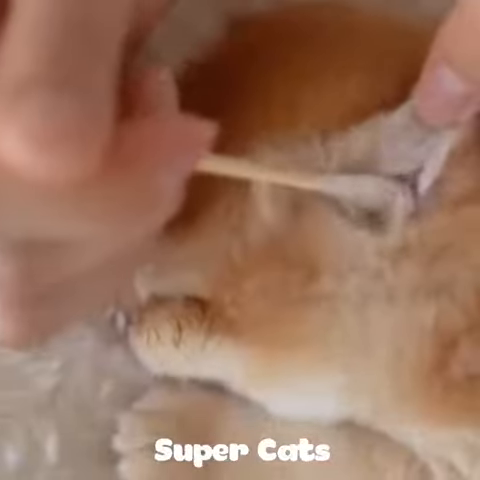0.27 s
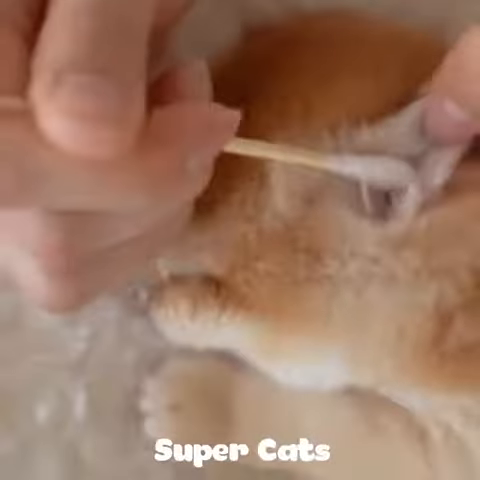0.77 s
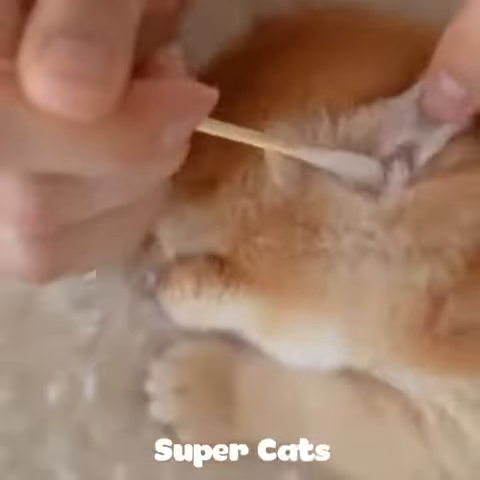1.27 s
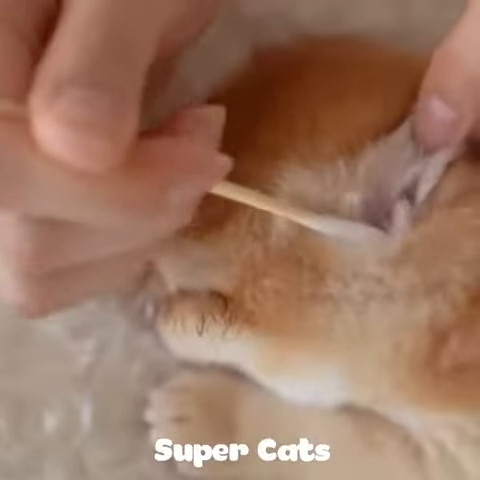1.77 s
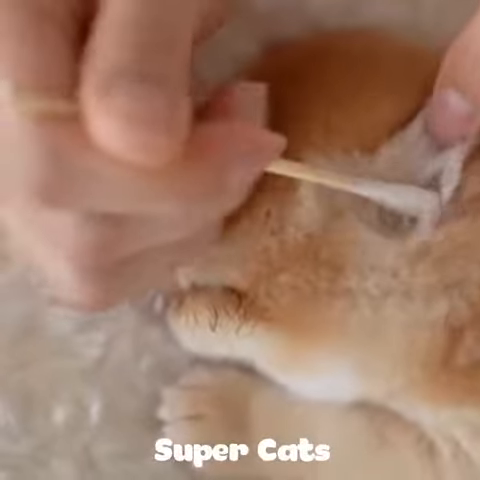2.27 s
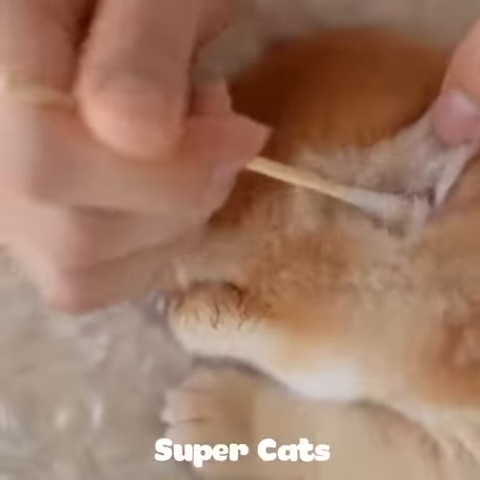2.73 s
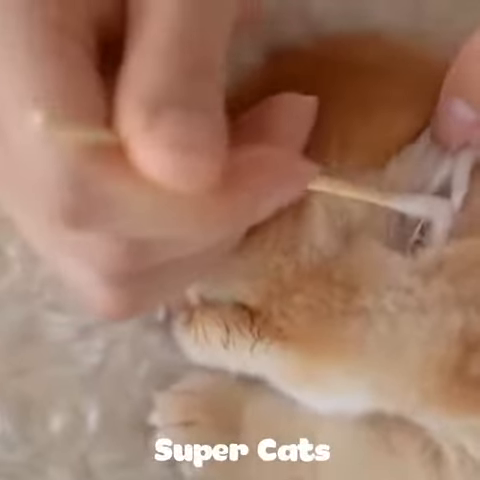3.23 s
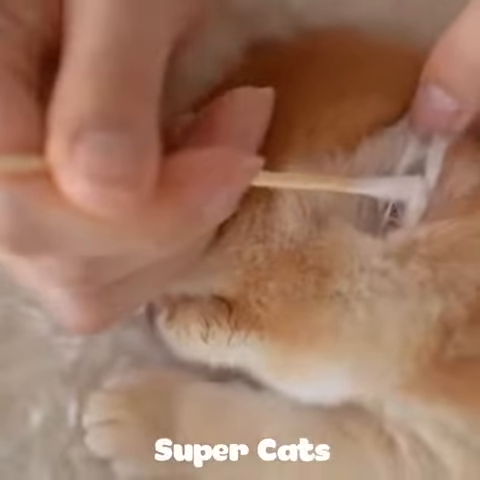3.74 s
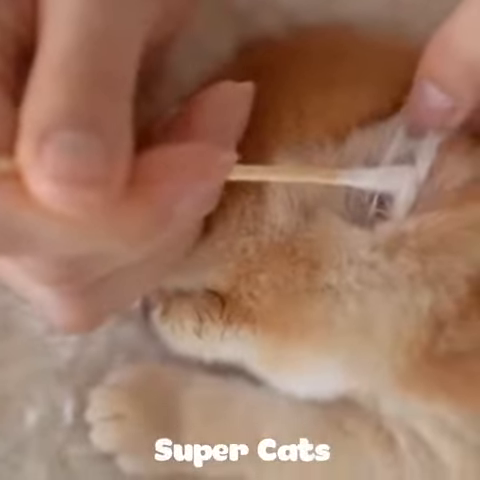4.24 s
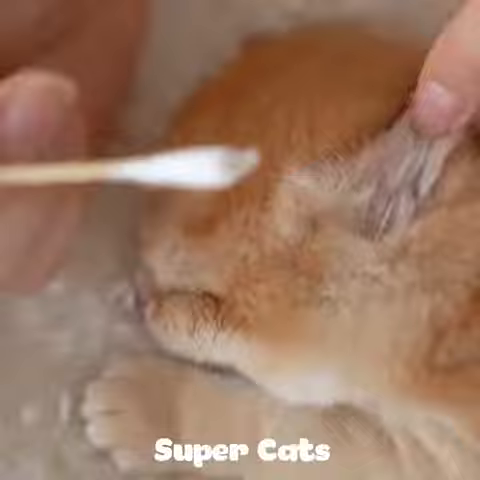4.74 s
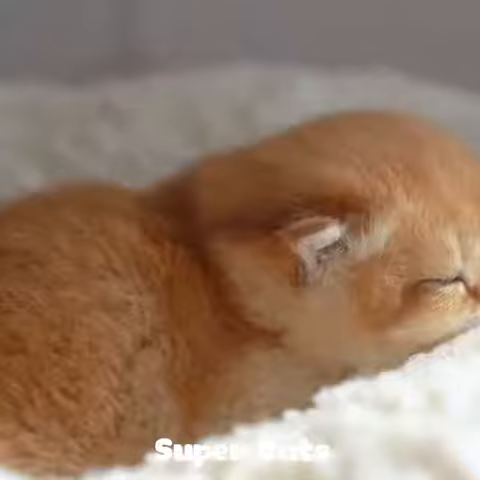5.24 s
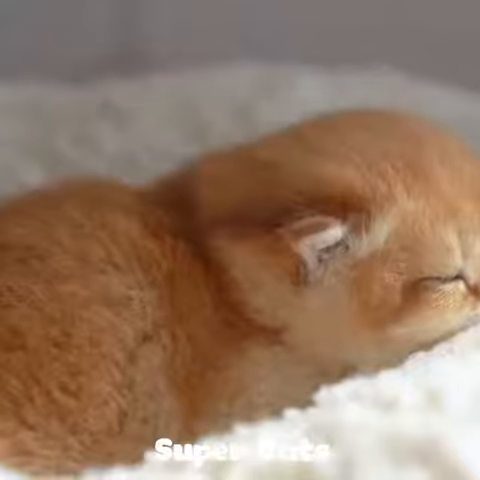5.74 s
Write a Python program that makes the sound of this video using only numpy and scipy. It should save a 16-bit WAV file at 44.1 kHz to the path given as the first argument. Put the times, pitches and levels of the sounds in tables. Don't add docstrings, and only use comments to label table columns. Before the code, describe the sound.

A cotton swab works in a small furry ear right against the left microphone, faint at the right. Soft hissing strokes come with dull low thumps and creaky runs of sticking clicks, then deeper twisting crackles and sharper snaps as it pulls out. After a brief quiet, the scene cuts to another room with a low throbbing motor-like hum.

```python
import sys
import numpy as np
from scipy import signal
from scipy.fft import rfft, irfft, next_fast_len
from scipy.io import wavfile
from scipy.ndimage import uniform_filter1d

SR = 44100
rng = np.random.default_rng(int(sys.argv[2]) if len(sys.argv) > 2 else 0)


def ratio_of_db(decibels):
    return 10 ** (np.asarray(decibels, float) / 20)


def waveform_to_disk(signal):
    frames = np.transpose(np.atleast_2d(signal))
    scaled = np.clip(frames, -1, 1) * 32767
    samples = np.round(scaled).astype(np.int16)
    wavfile.write(sys.argv[1], SR, samples)


N = 264644

# (time [s], resonance [Hz], strength of ringing [dB])
CAVITY = [(.04, 1340, 1), (.45, 1338, -7), (.62, 1742, -1), (.78, 1468, -10), (.9, 1715, 0.7),
          (1.05, 1446, -2.5), (1.28, 1360, -5), (1.49, 1590, 1.5), (1.8, 1574, -2), (1.9, 1320, -6),
          (2.12, 1327, -6), (2.2, 1986, -5.5), (2.47, 1503, -6), (3.1, 1711, 2), (3.54, 1498, -3.5),
          (3.81, 1650, -3), (3.89, 2350, -5), (4.4, 1948, -3)]
STROKE_RISE, STROKE_FALL = 1.287, 1.034


def rms_one(x):
    return x / np.sqrt(np.mean(x ** 2) + 1e-20)


def in_time(rows):
    s, *columns = np.transpose(rows)
    return [np.interp(np.arange(N) / SR, s, c) for c in columns]


def colour(x, points):
    hz, db = np.transpose(points)
    size = next_fast_len(N + 4096)
    grid = np.maximum(np.arange(size // 2 + 1) * SR / size, 1)
    gain = ratio_of_db(np.interp(np.log(grid), np.log(hz), db))
    return irfft(rfft(x, size) * gain, size)[..., :N]


def band(x, low_hz, high_hz):
    sos = signal.butter(2, [low_hz, min(high_hz, SR / 2.1)], "band", fs=SR, output="sos")
    return rms_one(signal.sosfilt(sos, x))


def resonance(hz, width_hz):
    r = np.exp(-np.pi * width_hz / SR)
    return (1 - r * r) / 2 * np.array([1, 0, -1]), [1, -2 * r * np.cos(2 * np.pi * hz / SR), r * r]


def moving_peak(force, centre_hz, wide):
    out, first, second = np.zeros(len(force)), np.zeros(2), np.zeros(2)
    for i in range(0, len(force), 256):
        b, a = resonance(centre_hz[i], wide * centre_hz[i])
        once, first = signal.lfilter(b, a, force[i:i + 256], zi=first)
        out[i:i + 256], second = signal.lfilter(b, a, once, zi=second)
    return rms_one(out)


def drift(rate_hz):
    r = np.exp(-2 * np.pi * rate_hz / SR)
    noise = rng.standard_normal(N + SR)
    return rms_one(signal.lfilter([1], [1, -2 * r, r * r], noise)[SR:])


def swells(rows, rise, fall, floor_db):
    t = np.arange(0, N, 16) / SR
    start, peak, end, db, *trait = np.array(rows).T[:, :, None]
    growing = np.clip((t - start) / (peak - start), 0, 1) ** rise
    sinking = np.clip((end - t) / (end - peak), 0, 1) ** fall
    power = (ratio_of_db(db) * growing * sinking) ** 2
    progress = np.clip((t - start) / (end - start), 0, 1)
    near = power + 1e-9 * np.exp(-np.abs(t - peak) * 20)
    mean = [np.sum(near * c, axis=0) / np.sum(near, axis=0) for c in trait + [progress]]
    level = 10 * np.log10(power.sum(axis=0) + ratio_of_db(floor_db) ** 2)
    return [np.interp(np.arange(N) / SR, t, c) for c in [level] + mean]


def whines(rows):
    peaks = [(db, resonance(hz, width_hz=60)) for hz, db in rows]
    out = 0
    for db, peak in peaks:
        once = signal.lfilter(*peak, rng.standard_normal(N))
        out = out + ratio_of_db(db) * rms_one(signal.lfilter(*peak, once))
    return out


def wavering_tone(hz, sway_hz, rate_hz):
    return np.sqrt(2) * np.sin(2 * np.pi * np.cumsum(hz + sway_hz * drift(rate_hz)) / SR)


def hum():
    # (time [s], hum level [dB], rumble level [dB])
    throbs = [
        (5.285, -37, -36.5),
        (5.385, -31.5, -39.5),
        (5.48, -41, -38),
        (5.555, -26.5, -29.5),
        (5.7, -29, -39.5),
        (5.77, -35, -51.5),
        (5.89, -33, -37.5),
        (5.995, -35, -36),
    ]
    idle_db, idle_rumble_db, throb_s = -40, -58, 0.0382
    s, hum_db, rumble_db = np.array(throbs).T[:, :, None]
    throb = np.exp(-((np.arange(N) / SR - s) / throb_s) ** 2)
    tone = wavering_tone(58.6, sway_hz=.8, rate_hz=5)
    rumble = wavering_tone(37, sway_hz=2.7, rate_hz=5.63)
    tone_gain = ratio_of_db(idle_db) + np.sum(ratio_of_db(hum_db - 3.5) * throb, axis=0)
    rumble_gain = ratio_of_db(idle_rumble_db) + np.sum(ratio_of_db(rumble_db) * throb, axis=0)
    return tone_gain * tone + rumble_gain * rumble


def rooms():
    # (frequency [Hz], level per Hz [dB])
    first_room = [(12, -60), (20, -17), (81, -4.5), (154, -13), (198, -13), (215, -16.5), (262, -18.5),
                  (497, -33), (822, -32), (1960, -46), (3330, -52.5), (9890, -54), (15900, -44.5)]
    last_room = [(53, -28), (90, 3.5), (148, -2), (290, -5.5), (410, -11.5), (2470, -37.5), (8490, -41.5),
                 (9880, -41), (14600, -33.5), (15900, -32)]
    # (frequency [Hz], level [dB])
    first_whines = [(3284, -86)]
    last_whines = [(3085, -85), (3353, -86), (5066, -84)]
    # (frequency [Hz], gain [dB])
    housing = [(8000, -1), (8700, 3.5), (9500, -5.5), (10200, -9.5), (10450, -2)]
    change_s = 5.237
    first = ratio_of_db(-45) * rms_one(colour(rng.standard_normal(N), first_room)) + whines(first_whines)
    last = ratio_of_db(-42.5) * rms_one(colour(rng.standard_normal(N), last_room)) + hum() + whines(last_whines)
    share = np.clip((np.arange(N) / SR - change_s) / 0.0113, 0, 1)
    return colour((1 - share) * first + share * last, housing)


def grip():
    # (time [s], level [dB], pitch [Hz], length [s])
    creaks = [
        (3.256, -35.5, 193, 0.084),
        (3.272, -38, 390, 0.083),
        (3.417, -39.5, 415, 0.072),
        (3.565, -44, 391, 0.054),
    ]
    t, out = np.arange(N) / SR, 0
    for s, db, hz, length in creaks:
        swell = np.exp(-((t - s) / (length / 2)) ** 2)
        gain = ratio_of_db(db + 2 + 3.656 * drift(30))
        out = out + gain * swell * np.sin(2 * np.pi * np.cumsum(hz + 12 * drift(28.04)) / SR)
    return out


def shake():
    # (start [s], peak [s], end [s], level [dB], swing [Hz])
    pushes = [(-.15, .2, 0.606, -32.5, 98.4), (.44, .564, 0.685, -25.5, 113),
              (.7, .79, 0.893, -26.5, 125.2), (.79, .853, .96, -27, 87.1), (1.0, 1.11, 1.18, -30, 137.6),
              (1.16, 1.285, 1.36, -25, 130.6), (1.33, 1.427, 1.5, -32.5, 120.5),
              (1.5, 1.581, 1.71, -24.5, 129.9), (1.68, 1.77, 1.8574, -36.5, 134.4),
              (1.81, 1.858, 1.88, -22.5, 125), (1.86, 1.938, 1.97, -32, 145.7),
              (1.98, 2.128, 2.16, -28.5, 89.2), (2.12, 2.2, 2.36, -33, 121.8),
              (2.34, 2.43, 2.62, -28.5, 120.4), (2.55, 2.67, 2.765, -30.5, 115.2),
              (2.78, 2.95, 3.074, -27, 124.1), (2.9, 3.05, 3.205, -27.5, 99.1),
              (3.03, 3.17, 3.23, -24, 99.9), (3.17, 3.26, 3.44, -25.5, 126),
              (3.37, 3.46, 3.48, -24.5, 75.67), (3.5, 3.602, 3.68, -29, 86),
              (4.1, 4.195, 4.27, -41.5, 169.3), (4.23, 4.31, 4.355, -47.5, 106),
              (4.45, 4.7, 4.741, -34, 92.09)]
    return swells(pushes, rise=1.123, fall=0.851, floor_db=-50)[:2]


def head():
    db, hz = shake()
    drag = rng.standard_normal((2, N))
    body = moving_peak(drag[0], hz, wide=0.706)
    body = rms_one(body / np.abs(signal.hilbert(body)) ** 0.34)
    overtone = moving_peak(drag[1], 1.806 * hz, wide=0.578)
    return ratio_of_db(db - 4.5) * (body + 0.383 * overtone + 0.664 * band(drag[1], 36.7, 115))


def knocks():
    # (time [s], level [dB], swing [Hz])
    bumps = [
        (.556, -27, 110),
        (.7625, -27, 130),
        (1.072, -26, 115),
        (1.0825, -21, 130),
        (1.858, -21, 110),
        (1.9345, -24, 120),
        (3.449, -26, 70.4),
        (4.327, -20, 70.7),
        (4.369, -26.5, 95.5),
    ]
    out = 0
    for s, db, hz in bumps:
        since = np.maximum(np.arange(N) / SR - s, 0)
        out = out + ratio_of_db(db) * np.sin(2 * np.pi * hz * since) * np.exp(-(since * hz / 1.45) ** 2)
    return out


def scrapes():
    # (start [s], end [s], level [dB], first pitch [Hz], last pitch [Hz])
    ridges = [
        (0.649, 0.748, -37, 4200, 2750),
        (1.403, 1.56, -37, 4250, 2495),
        (2.2, 2.345, -35.5, 2500, 3700),
        (3.49, 3.645, -35, 2750, 3340),
        (4.199, 4.341, -31.5, 2000, 2300),
        (4.2, 4.335, -33.5, 3100, 3500),
        (4.229, 4.36, -33, 5210, 6050),
        (4.26, 4.39, -45, 9500, 12500),
        (4.06, 4.165, -47.5, 4500, 6000),
    ]
    out = np.zeros(N)
    for start, end, db, first_hz, last_hz in ridges:
        at, size = int(start * SR), int((end - start) * SR)
        along = np.arange(size) / size
        rough = rng.standard_normal(8192) * ratio_of_db(3.0 * np.minimum(rng.exponential(1, 8192), 3))
        glide = moving_peak(rough[:size], first_hz * (last_hz / first_hz) ** along, wide=0.33)
        out[at:at + size] += ratio_of_db(db) * np.sin(np.pi * along) ** 0.706 * glide
    return out


def fibres(spread_db, clump_db, clump_hz):
    return ratio_of_db(spread_db * np.minimum(rng.exponential(1, N), 3) + clump_db * drift(clump_hz))


def stuck(events):
    at = np.array([row[0] for row in events if row[1] > -29])
    t = np.arange(N) / SR
    after = np.clip(np.searchsorted(at, t), 1, len(at) - 1)
    close = at[after] - at[after - 1] < .03
    held = close & (t - at[after - 1] > .003) & (t < at[after])
    return -4.8 * uniform_filter1d(held.astype(float), size=60)


def rubbing(events):
    # (start [s], peak [s], end [s], hiss level [dB], speed [about 0-1])
    strokes = [(.03, .045, 0.112, -52.5, 0.95), (.04, .18, 0.297, -53.5, 1.24),
               (.215, .243, 0.2745, -48, 0.89), (.39, .565, 0.6413, -31.5, 0.87),
               (.62, .685, 0.891, -33, 0.26), (.74, .885, 1.0287, -30.5, 0.72), (1.0, 1.13, 1.15, -37, 0.77),
               (1.08, 1.26, 1.35, -31.5, 0.83), (1.398, 1.42, 1.576, -33, 0.33),
               (1.54, 1.7, 1.83, -31.5, 0.72), (1.8, 1.87, 2.03, -35, 0.81), (1.83, 2.11, 2.176, -27.5, 0.94),
               (2.1, 2.2, 2.28, -31.5, 0.65), (2.15, 2.3, 2.34, -28.5, 0.4), (2.34, 2.375, 2.4925, -31, 0.51),
               (2.36, 2.474, 2.63, -30.5, 0.98), (2.54, 2.66, 2.739, -37.5, 0.81),
               (2.3, 2.345, 2.39, -44.5, 1.09), (.3, 1.1, 3.3, -46.5, 0.66), (1.7, 2.7, 3.35, -51.5, 1),
               (2.8, 2.903, 2.957, -43, 1), (2.879, 2.945, 3.04, -37, 0.78), (2.97, 3.101, 3.18, -40, .5),
              (3.097, 3.184, 3.238, -36.5, .7), (3.239, 3.26, 3.4, -42, .7),
              (3.239, 3.419, 3.525, -38, 0.63), (3.416, 3.552, 3.63, -25.5, .15),
              (3.528, 3.619, 3.643, -29, 0.41), (3.64, 3.67, 3.7, -50, .1), (3.685, 3.77, 3.88, -41.5, .12),
              (3.82, 3.86, 3.89, -52, .1), (4.0, 4.04, 4.07, -50, .2), (4.13, 4.155, 4.2, -42, .2),
              (3.884, 3.95, 3.985, -38, .0), (3.983, 4.0, 4.04, -50.5, 0.34), (4.03, 4.11, 4.22, -37, .15),
              (4.16, 4.249, 4.3, -30, .1), (4.2, 4.316, 4.345, -23.5, 0.8),
              (4.29, 4.348, 4.385, -36.5, 1.45), (4.334, 4.39, 4.56, -51.5, 0.45)]
    # (start [s], peak [s], end [s], level [dB])
    presses = [
        (.7, .783, 0.784, -30),
        (1.402, 1.414, 1.47, -29),
        (1.42, 1.492, 1.578, -31),
        (2.4, 2.48, 2.594, -30.5),
        (2.84, 2.93, 3.037, -37.5),
        (3.3, 3.53, 3.59, -29),
        (3.7, 3.73, 3.758, -49.5),
        (3.89, 3.92, 3.96, -40),
    ]
    # (frequency [Hz], level per Hz [dB])
    fibre_tone = [(200, 8.5), (1000, 10.5), (5000, 0), (9000, -5.5), (15900, -13.5)]
    resting_db = -66.5
    slow_hz, fast_hz, sag_octaves = 2778, 4200, 0.68
    slow_spread, fast_spread = 1, 1.474
    slow_fine_db, fast_fine_db = -16, -3.5

    hiss_db, speed, progress = swells(strokes, STROKE_RISE, STROKE_FALL, -100)
    press_db = swells(presses, STROKE_RISE, STROKE_FALL, -100)[0]
    shake_db, shake_hz = shake()
    cavity_hz, rings_db = in_time(CAVITY)
    cavity_db = 10 * np.log10(ratio_of_db(hiss_db + rings_db) ** 2 + ratio_of_db(press_db) ** 2)
    sag = sag_octaves * (.4 - progress) * np.clip(1 - speed, 0, 1)
    hiss_hz = (slow_hz + (fast_hz - slow_hz) * speed) * 2 ** sag
    fine_db = hiss_db + slow_fine_db + (fast_fine_db - slow_fine_db) * speed
    skin_db = -4.5 + 0.6713 * hiss_db + 0.3814 * shake_db
    skin_db = skin_db - 11.5 * np.log2(cavity_hz / 1500) + 1 * np.log2(120 / shake_hz)

    snags = fibres(spread_db=0.5, clump_db=1.0, clump_hz=86) * rng.standard_normal((3, N))
    low, middle, high = colour(snags, fibre_tone)
    hollow = moving_peak(low, cavity_hz, wide=0.572)
    fold = moving_peak(middle, hiss_hz, wide=.52)
    broad = (slow_spread + (fast_spread - slow_spread) * speed) * band(high, 2380, 7630)
    layers = [(cavity_db, hollow), (hiss_db - 7.0, fold + broad),
              (fine_db, band(low, 4880, 15740)), (skin_db, band(high, 267.5, 1053))]
    total = sum(ratio_of_db(np.maximum(db, resting_db) + 1.0 * drift(39.3)) * layer for db, layer in layers)
    return ratio_of_db(stuck(events)) * total


def slip_list():
    # (time [s], level [dB])
    back_slips = [(.4788, -34), (1.0575, -32), (1.0719, -28), (1.0814, -27), (1.0875, -25), (1.4121, -21.5),
                  (1.7911, -20), (1.7994, -24.5), (1.8303, -27), (1.8437, -22.5), (1.8569, -24),
                  (3.4747, -25)]
    creak_run = [(2.4662, -18.0), (2.4815, -18.0), (2.493, -16.0), (2.5017, -21.0), (2.5116, -20.0),
                 (2.5181, -21.0), (2.5251, -19.0), (2.5323, -21.0), (2.5384, -20.0), (2.5449, -22.0),
                 (2.5509, -25.0), (2.5574, -29.0), (2.5641, -21.0), (2.5711, -21.0), (2.5795, -24.0),
                 (2.591, -18.0), (2.6004, -20.0), (2.6139, -22.0), (2.6241, -24.0), (2.6325, -24.0),
                 (2.6398, -26.0), (2.6482, -19.0), (2.6606, -20.0), (2.6695, -25.0), (2.6868, -27.0),
                 (2.7087, -19.0)]
    deep_slips = [(2.8796, -30.0), (2.8926, -30.0), (2.903, -29.0), (2.9095, -29.0), (2.9244, -19.5),
                  (2.9359, -17.5), (2.942, -27.0), (2.947, -26.0), (2.9523, -24.0), (2.9569, -24.0),
                  (2.9637, -25.0), (2.9817, -19.5), (2.9908, -19.5), (3.0012, -32.0), (3.0107, -23.0),
                  (3.0226, -24.0), (3.0322, -25.0), (3.045, -19.5), (3.0535, -23.0), (3.0639, -22.0),
                  (3.0751, -24.0), (3.0904, -26.0), (3.0962, -29.0), (3.1091, -16.5), (3.1277, -23.0),
                  (3.1363, -31.0), (3.1475, -25.0), (3.1553, -29.0), (3.1645, -29.0), (3.1738, -28.0),
                  (3.1867, -28.0), (3.1945, -29.0), (3.2414, -18.5), (3.2557, -19.5), (3.2632, -33.0),
                  (3.2723, -31.0), (3.2785, -32.0), (3.2873, -24.0)]
    # (time [s], level [dB])
    push_slips = [(0.775, -20.0), (0.783, -21.0), (0.794, -20.0), (0.8032, -24.0), (0.8175, -24.0),
                  (0.8331, -18.0), (0.8454, -19.0), (0.8796, -19.0), (1.4625, -18.0), (1.4671, -20.0),
                  (1.4717, -22.0), (1.4765, -21.0), (1.4807, -15.0), (1.4858, -14.0), (1.4911, -17.0),
                  (1.4977, -23.0), (1.5016, -14.0), (1.506, -23.0), (1.5129, -19.0), (1.5191, -21.0),
                  (1.5242, -23.0), (1.5287, -26.0), (1.5326, -23.0), (1.5365, -23.0), (1.5544, -22.0),
                  (1.5662, -24.0), (1.5749, -20.0), (1.5825, -26.0), (1.5927, -18.0)]
    # (time [s],
    # level [dB], pitch [Hz])
    snaps = [(3.6386, -14.5, 2350), (3.6895, -30.5, 2500), (3.7012, -36, 3119), (3.7077, -13.5, 3080),
             (3.7197, -18, 2800), (3.7334, -13, 3110), (3.7467, -22, 2500), (3.79, -19.5, 2360),
             (3.817, -17, 2750), (3.8379, -17.5, 2897), (3.8942, -14.5, 2820), (3.9093, -22.5, 3097),
             (3.924, -17, 2830), (3.95, -21, 2340), (3.9684, -15.5, 2974), (4.0515, -15, 3061),
             (4.066, -26.5, 1941), (4.079, -27, 2430), (4.114, -31.5, 2199), (4.144, -18.5, 2138),
             (4.172, -18, 2110), (4.1879, -17, 2350), (4.2031, -15, 2240), (4.4257, -36.5, 2179),
             (4.5705, -35.5, 2622), (4.627, -41, 2044), (4.647, -45.5, 2210),
             (3.6706, -42.0, 2600.0), (3.6793, -42.0, 2600.0), (3.7284, -36.0, 2600.0),
             (3.7535, -35.0, 2600.0), (3.7609, -33.0, 2600.0), (3.7686, -34.0, 2600.0),
             (3.7742, -33.0, 2600.0), (3.7802, -37.0, 2600.0), (3.8025, -34.0, 2600.0),
             (3.8688, -46.0, 2600.0), (3.8752, -45.0, 2600.0), (3.9356, -35.0, 2600.0),
             (3.9598, -39.0, 2600.0), (3.9937, -39.0, 2600.0), (4.0141, -43.0, 2600.0),
             (4.028, -44.0, 2600.0), (4.0408, -40.0, 2600.0), (4.0564, -42.0, 2600.0),
             (4.0927, -34.0, 2600.0), (4.0984, -33.0, 2600.0), (4.1108, -30.0, 2600.0),
             (4.1295, -30.0, 2600.0), (4.1356, -29.0, 2600.0), (4.1601, -35.0, 2600.0),
             (.0425, -46, 1500), (.125, -50, 6000), (.146, -47, 2000), (.236, -45, 4200), (.25, -45, 2600),
              (.7345, -24, 2200), (3.8914, -34, 2600), (3.9112, -30, 3000), (4.0472, -36, 3500),
              (4.2168, -23, 2300), (4.552, -45, 2600)]

    s, db = np.transpose([*back_slips, *creak_run, *deep_slips, *push_slips])
    way = np.where(np.arange(len(s)) < len(s) - len(push_slips), 1, -1)
    light = (s > 1.455) & (s < 1.545)
    way = np.where(light, .25, 1) * way
    db = db - 2.5 * light
    chance = 2 ** (0.1 * rng.standard_normal(len(s)))
    hz = 1.074 * in_time(CAVITY)[0][(s * SR).astype(int)] * chance
    rim_grip = 0.55
    rim = [(*row, rim_grip) for row in snaps]
    return sorted(list(zip(s, db, hz, way)) + rim)


def slips(events):
    canal_hz, canal_share, canal_s = 1250, 0.33, 0.0016
    out, t = np.zeros(N + 2048), np.arange(2048) / SR
    luck = rng.standard_normal((len(events), 2))
    fray = band(rng.standard_normal(N + 2048), 1120, 6000)
    shake_db, shake_hz = shake()
    for (s, click_db, hz, way), (a, b) in zip(events, luck):
        at = int(s * SR) - 20
        cycles = t * hz - .45
        deep = 1500 / hz
        suction = -.55 * abs(way) * deep ** 2 * np.exp(-((cycles - .25) / .3) ** 2)
        ring = -np.sin(2 * np.pi * cycles) * np.exp(-cycles / (1.6 * np.sqrt(deep))) * (cycles > 0)
        canal = np.sin(2 * np.pi * canal_hz * t) * np.exp(-t / canal_s)
        ring = ring - canal_share * max(1 - deep, 0) * canal
        fray_decay = np.exp(-t / 0.000993) + 0.41 * np.exp(-t / 0.00196)
        frayed = 0.3 * deep ** 0.7 * ratio_of_db(2.0 * a) * fray[at:at + 2048] * fray_decay
        click = ratio_of_db(click_db + 0.5) * (suction + ring + frayed) * (1 - np.exp(-t * 7000))
        rebound = -np.cos(2 * np.pi * 1.22 * shake_hz[at] * t)
        rebound = rebound * np.exp(-t / 0.0058) * (1 - np.exp(-t * 2500))
        rebound_db = shake_db[at] + 8.0 + 0.5 * (click_db + 22) + 1.5 * b
        out[at:at + 2048] += np.sign(way) * (click + abs(way) * ratio_of_db(rebound_db) * rebound)
    return signal.sosfilt(signal.butter(2, 7500, fs=SR, output="sos"), out[:N])


def scene():
    # (frequency [Hz], gain [dB])
    far_side = [(60, -21), (300, -19.5), (1400, -21.5), (15000, -19.5)]
    lift_s = 4.73
    contact = np.clip((lift_s - np.arange(N) / SR) / 0.0677, 0, 1)
    events = slip_list()
    held_head = ratio_of_db(1.4 * stuck(events)) * head()
    swab = contact * (rubbing(events) + held_head) + slips(events) + knocks() + scrapes()
    creak, room = grip(), rooms()
    return np.array([swab + 0.26 * creak, colour(swab, far_side) + creak]) + room


def roll_off(x):
    return signal.sosfilt(signal.butter(12, 16340, fs=SR, output="sos"), x)


def record(dry):
    opening = np.clip((np.arange(N) / SR - .026) / 0.0126, .06, 1)
    rounded = 0.3896 * np.tanh(dry / 0.3203)
    cut = signal.cheby2(14, 60, 16150, fs=SR, output="sos")
    return roll_off(signal.sosfilt(cut, rounded * opening))


dry = scene()
out = record(dry)
waveform_to_disk(out)
```